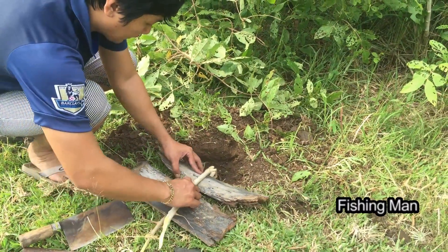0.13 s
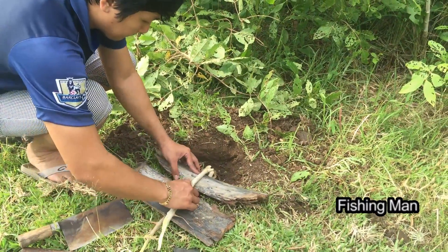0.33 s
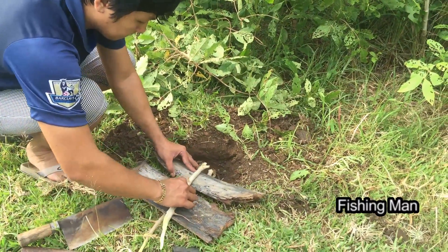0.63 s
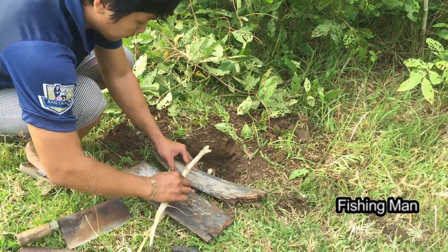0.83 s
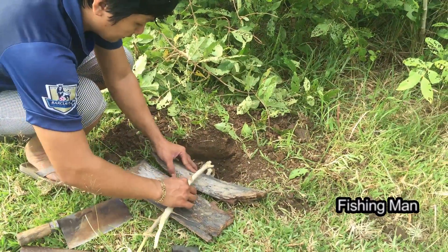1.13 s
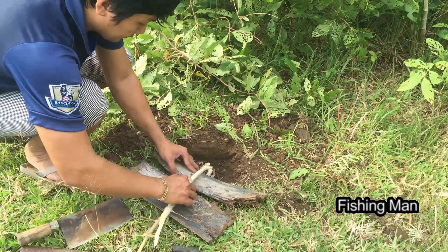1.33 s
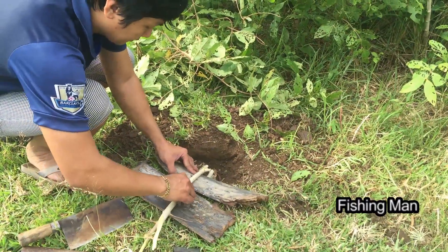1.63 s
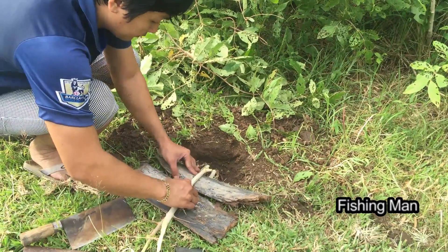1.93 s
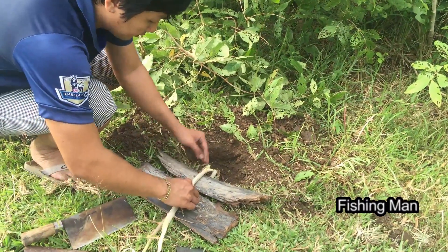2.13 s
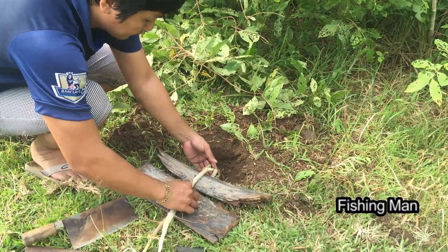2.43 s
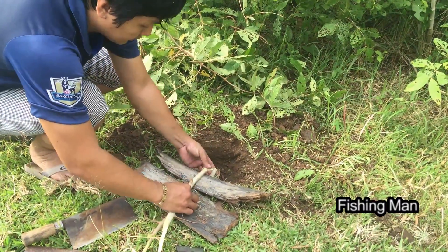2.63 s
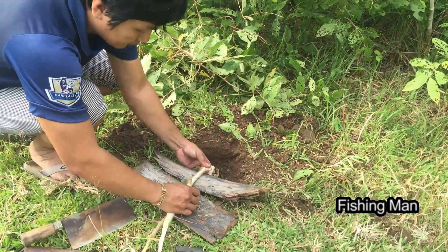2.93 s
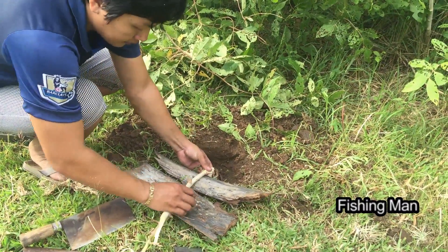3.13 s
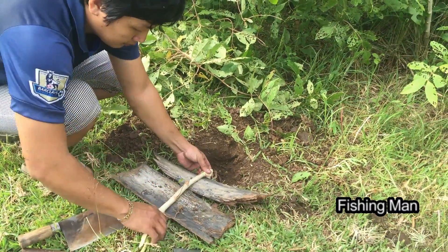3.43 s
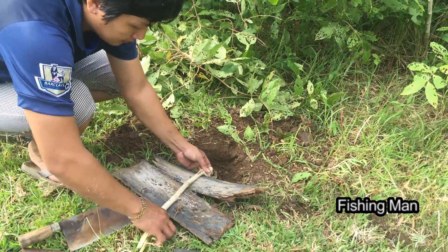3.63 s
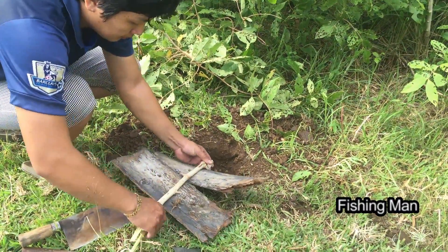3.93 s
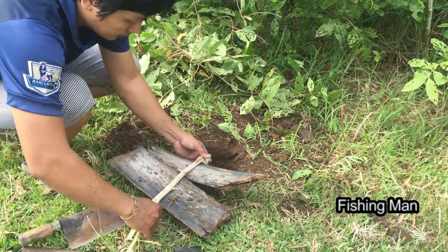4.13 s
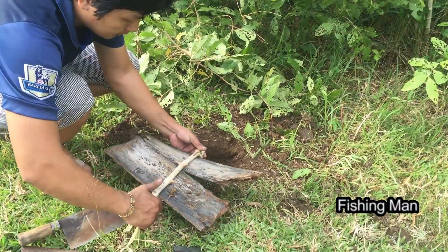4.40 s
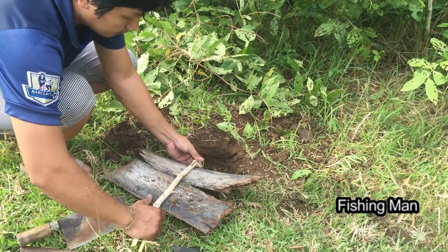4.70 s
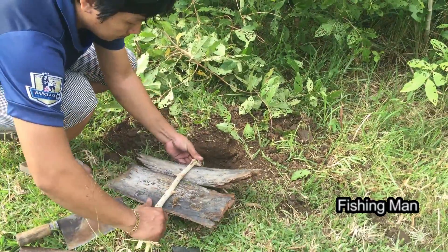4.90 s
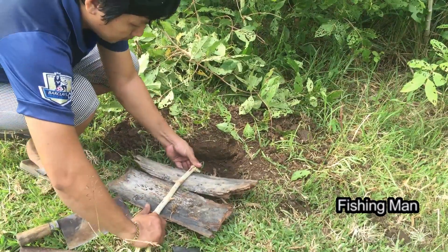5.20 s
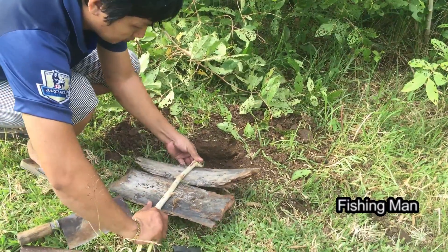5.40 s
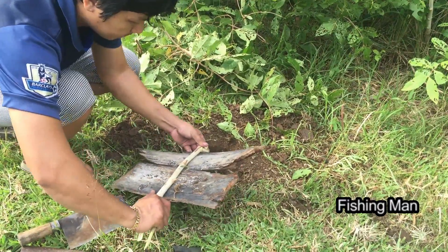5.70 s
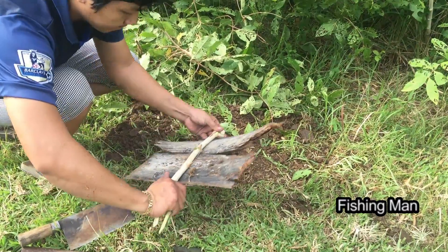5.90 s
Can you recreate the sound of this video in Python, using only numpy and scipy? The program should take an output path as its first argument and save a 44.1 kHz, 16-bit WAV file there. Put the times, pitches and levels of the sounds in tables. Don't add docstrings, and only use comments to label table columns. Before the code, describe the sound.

Outdoors, about a metre from a phone, wood clicks and bark crackles softly as grass is brushed. Faint even bird whistles repeat, then a dropped stick strikes the slab with a short dry knock, by far the loudest moment. Quick bird chips follow, with a tight burst of snapping and tapping midway. Soft late scuffs, distant thudding hammer blows and a throbbing bird churr end it, over low engine hum and breeze.

```python
import sys
import numpy as np
from scipy import signal
from scipy.fft import rfft, irfft, next_fast_len
from scipy.io import wavfile
from scipy.ndimage import uniform_filter1d

SR = 44100
rng = np.random.default_rng(int(sys.argv[2]) if len(sys.argv) > 2 else 0)


def gain_from_db(level_db):
    decades = np.asarray(level_db, float) / 20
    return 10 ** decades


def int16_out(signal):
    q = np.round(np.clip(np.atleast_2d(signal).T, -1, 1) * 32767)
    wavfile.write(sys.argv[1], SR, q.astype(np.int16))


N = 266937
T = np.arange(N) / SR


def band(x, lo_hz, hi_hz, order=2):
    return signal.sosfilt(signal.butter(order, [lo_hz, min(hi_hz, .45 * SR)], "band", fs=SR, output="sos"), x)


def unit(x):
    return x / np.sqrt(np.mean(x ** 2))


def add(out, start_s, x):
    i = int(start_s * SR)
    x = x[max(-i, 0):N - i]
    out[max(i, 0):max(i, 0) + len(x)] += x


def walk(rate_hz):
    hold = int(SR / rate_hz)
    steps = np.repeat(rng.standard_normal(N // hold + 1), hold)
    return 1.331 * uniform_filter1d(uniform_filter1d(steps, hold), hold)[:N]


def ring(modes, rise_s, peak_db):
    t = T[:SR // 8]
    x = sum(gain_from_db(db - 60 * t / t60_s) * np.sin(2 * np.pi * hz * t) for hz, db, t60_s in modes)
    x = x * (1 - np.exp(-t / rise_s))
    return x * gain_from_db(peak_db) / np.abs(x).max()


def grit(size, scatter_db):
    strength = np.minimum(rng.exponential(size=size // 16 + 1), 4.5)
    strength = np.repeat(strength, 16)[:size]
    return unit(rng.standard_normal(size) * gain_from_db(scatter_db * strength))


def scatter(x, t60_s, wet_db):
    t = T[:SR // 3]
    tail = band(rng.standard_normal(len(t)), 220, 9300, order=1) * gain_from_db(-60 * t / t60_s)
    return x + gain_from_db(wet_db) * signal.fftconvolve(x, tail / np.sqrt(np.sum(tail ** 2)))[:N]


def hush():
    # frequency in Hz, level in dB per Hz.
    spectrum = [(25, -11.5), (60, 2.5), (124, -0.5), (192, -10.5), (399, -29.5), (1730, -31.5), (4990, -40),
                (15200, -46.5)]
    # time in s, gust at the phone in dB, stirring of the leaves in dB.
    moving_air = [(0, -6, 5), (.4, 1, 0.5), (.75, -2.5, 1.5), (1.05, 0.5, -2), (1.45, 3.5, -0.5),
                  (1.75, 2.5, 1), (2.3, -5, -3), (2.7, 1.5, 0), (3.3, -2, 0.5), (3.9, 2, 2.5),
                  (4.2, -0.5, -1), (4.7, 2, -0.5), (4.97, 1, -2), (5.2, 0, 1), (5.5, 2.5, 0),
                  (6.05, 1, 1.5)]
    size = next_fast_len(N)
    hz = np.fft.rfftfreq(size, 1 / SR) + 1
    knot_hz, knot_db = np.transpose(spectrum)
    air = rfft(rng.standard_normal(size)) * gain_from_db(np.interp(np.log(hz), np.log(knot_hz), knot_db))
    air = air * gain_from_db(-49.5) / np.std(irfft(air, size))
    s, *levels = np.transpose(moving_air)
    gust, stir = (np.interp(T, s, db) for db in levels)
    lifts_db = [gust, gust, 0, 0, .7 * stir, .8 * stir, .7 * stir, 1.5 * stir, .79 * stir, stir]
    out, octave = 0, np.clip(np.log2(hz / 31.25), 0, 9)
    for k, lift_db in enumerate(lifts_db):
        share = np.clip(1 - np.abs(octave - k), 0, 1)
        out = out + irfft(air * share, size)[:N] * gain_from_db(lift_db + 1.9 * walk(12))
    return out


def engine():
    # time in s, firing rate in Hz, level in dB, lope (odd orders against even) in dB.
    running = [(0, 57.1, -50.5, -24), (.5, 58, -61.5, 1.5), (1, 57.84, -56.5, 0), (1.5, 59, -61, 0.5),
               (2, 60, -54.5, -7.5), (2.5, 60.5, -51.5, -6.5), (3, 60.34, -52.5, -3.5),
               (3.3, 61.62, -58.5, 4), (3.55, 63.2, -49.5, -13), (4, 62.4, -52, -20),
               (4.4, 61.5, -63.5, -3.5), (5.5, 61.62, -56, -4), (6.05, 63.17, -59, -1)]
    # order of the firing rate, level in dB.
    orders = [(1, 1.5), (2, 2), (3, 2.5), (4, -15.5), (5, -19.5)]
    s, *columns = np.transpose(running)
    hz, level_db, lope_db = (np.interp(T, s, c) for c in columns)
    phase = 2 * np.pi * np.cumsum(hz * (1 + .01 * walk(9))) / SR
    out = np.zeros(N)
    for k, db in orders:
        order_db = db + level_db + k % 2 * lope_db + 2.2 * walk(7)
        out += gain_from_db(order_db) * np.sin(k * phase + k ** 2)
    return out


def chatter(count, db):
    out, t = np.zeros(N), T[:SR // 20] - .025
    for when, pitch, length, size in rng.random((count, 4)):
        tone = np.sin(2 * np.pi * 450 * 2 ** (4.4 * pitch) * t)
        swell = np.exp(-(t / (.00312 + .0059 * length)) ** 2)
        add(out, when * N / SR - .025, gain_from_db(db + 10 * size - 11 * pitch) * swell * tone)
    return out


def scuffs():
    # middle in s, rms level in dB, centre in Hz, length in s. Grass brushed, bark scraped, hollow
    grass = [(0.019, -70, 3000, .081), (0.233, -61.5, 2410, 0.092), (1.731, -59, 2416, 0.027),
             (2.186, -61, 5000, 0.034), (3.144, -68.5, 3940, 0.054), (3.44, -63.5, 4000, .045),
             (3.689, -72, 4960, .12), (3.745, -60, 2500, .14), (4.772, -68.5, 9000, .08),
             (5.259, -66, 10000, .092), (5.768, -68, 8000, 0.063), (5.988, -66, 6000, 0.038)]
    scraped_bark = [(.114, -61, 1920, .055), (.519, -69, 3000, 0.099), (.709, -63.5, 2500, 0.074),
                    (.852, -65, 1200, 0.13), (1.62, -62, 1900, 0.18), (1.734, -53.5, 910, 0.068),
                    (2.47, -62.5, 2100, 0.044), (3.121, -62, 1260, 0.051), (3.971, -68.5, 5960, .13),
                    (3.8, -63, 2500, .08), (3.89, -66, 4000, .05), (3.25, -67, 1500, .1),
                    (5.88, -68, 2000, .1), (4.368, -68.5, 6000, .022), (4.909, -63, 600, 0.039)]
    hollow_slab = [(.872, -61, 6500, 0.015), (.23, -61.5, 524, 0.056), (1.56, -46, 1050, .012),
                   (2.66, -62.5, 1800, .03), (1.14, -64.5, 1020, 0.11), (1.32, -65, 1110, 0.036),
                   (2.16, -58.5, 1280, 0.11), (3.371, -62, 980, 0.11), (3.419, -58.5, 440, 0.029),
                   (4.281, -58.5, 376, 0.041), (5.744, -63, 1000, 0.074), (5.948, -63, 1010, 0.064)]
    blurred_calls = [
        (.909, -64.5, 3650, .02),
        (1.32, -65, 2870, 0.13),
        (1.43, -71, 4150, 0.045),
        (3.49, -63, 3430, 0.026),
        (4.2, -65.5, 2900, 0.5),
        (4.54, -66.5, 3570, .023),
    ]
    widths_oct = (2.9, 1.1, 0.47, .14)
    out, t = np.zeros(N), T[:SR // 4] - .125
    for rows, octaves in zip((grass, scraped_bark, hollow_slab, blurred_calls), widths_oct):
        half = 2 ** (octaves / 2)
        for s, db, hz, length_s in rows:
            rub = unit(band(grit(len(t), 4.2), hz / half, hz * half, order=1))
            stroke = np.exp(-(2 * t / length_s) ** 2) * np.hanning(len(t)) ** .27
            add(out, s + t[0], gain_from_db(db) * rub * stroke)
    return out


def snaps(rows, top_db):
    out, t = np.zeros(N), T[:SR // 8]
    for s, db, hz, t60_s in rows:
        t60_s = max(t60_s, .003)
        snap = grit(len(t), 3.4)
        body = unit(band(snap, hz / 1.08, hz * 1.07, order=1)) + 1.1 * unit(band(snap, 1700, 10500, order=1))
        top = gain_from_db(top_db) * unit(band(snap, 9000, 17000))
        shape = (1 - np.exp(-(t / (.16 * t60_s)) ** 2)) * gain_from_db(-60 * t / t60_s)
        burst = (body + top) * shape
        level = np.sqrt(np.sum(shape ** 2) / np.sum(burst ** 2)) / shape.max()
        add(out, s - .1 * t60_s, gain_from_db(db - 7.5) * burst * level)
    return out


def cracks():
    # time in s, peak in dB, centre in Hz, t60 in s.
    fibres = [(.0065, -35, 4470, 0.026), (.0112, -49, 4040, .011), (.099, -48, 5800, .009),
              (.2165, -37, 4400, 0.019), (.2154, -30, 6100, .024), (.4883, -54, 6200, .018),
              (.6494, -56, 4300, .018), (.853, -50, 3120, .021), (1.5662, -32.5, 3800, 0.011),
              (2.1866, -39.5, 2885, 0.016), (2.792, -55, 4330, .018), (3.7005, -43, 3020, .018),
              (3.7225, -44, 5150, .03), (3.7245, -30, 5500, .012), (3.7263, -27, 5900, .014),
              (3.7334, -37.5, 5090, .018), (4.6708, -47, 3100, .013), (5.0654, -50.5, 3300, .011),
              (5.806, -50, 5500, 0.055), (6.0292, -49.5, 4100, 0.016)]
    return snaps(fibres, top_db=-16.5)


def strike(contacts):
    out = np.zeros(N)
    for s, db, hz, t60_s, upper_hz, upper_db in contacts:
        t60_s = max(t60_s, .003)
        modes = [(hz, 0, t60_s), (hz * .67, -15, t60_s * .8), (upper_hz, upper_db, t60_s * 1.1),
                 (upper_hz * 1.45, upper_db - 9.5, t60_s * .6), (upper_hz * 2.2, upper_db - 17, t60_s)]
        add(out, s - .0006, ring(modes, 1.6 / hz, db))
    return out


def knocks():
    # time in s, peak in dB, main mode in Hz, t60 in s, stick mode in dB.
    hits = [(.007, -44, 1740, 0.045, 4), (0.0995, -32, 1440, 0.0093, -5.5), (3.413, -41.5, 644, 0.02, -6),
            (3.632, -57, 740, 0.026, -8), (3.687, -49, 880, .03, -21), (3.7024, -31, 830, 0.007, -12),
            (1.5533, -29, 1080, .008, -12), (1.735, -47, 1050, .012, -8), (3.7012, -29, 830, .008, -10),
            (3.7062, -50, 790, .01, -10), (4.67, -54, 900, .015, -6), (3.694, -50, 950, .012, -12),
            (3.751, -40.5, 377, 0.012, -20), (4.269, -44.5, 620, 0.024, -5),
            (4.364, -47.5, 602, 0.069, 1.5), (4.622, -47.5, 417, .022, -7), (5.065, -51.5, 548, .04, -3),
            (5.074, -38, 516, 0.028, -18)]
    return strike([(s, db, hz, t60_s, 1000, stick_db) for s, db, hz, t60_s, stick_db in hits])


def splinters():
    # time in s, peak in dB, centre in Hz, t60 in s.
    slivers = [
        (0.025, -50, 4420, 0.029),
        (.5891, -45, 3100, 0.0095),
        (1.5478, -39, 8800, .008),
        (1.551, -29, 7950, 0.0062),
        (1.5527, -28, 6800, 0.012),
        (2.1235, -41.5, 11800, 0.015),
        (4.0594, -53, 13000, .017),
        (4.297, -46, 3590, 0.011),
        (4.622, -47.5, 5250, 0.0081),
    ]
    return snaps(slivers, top_db=-5.5)


def taps():
    # time in s, peak in dB, main mode in Hz, upper mode in Hz, upper mode in dB.
    touches = [(.09, -50, 1100, 1600, -2), (.108, -49, 1100, 1700, 0), (.116, -44, 1000, 1610, 1),
               (.133, -47, 1250, 1600, -4), (.214, -37.5, 1020, 1900, 3), (.276, -49, 960, 1580, 5),
               (.336, -52, 1010, 1470, -12), (.589, -46.5, 850, 1590, 10), (.854, -52, 1080, 1410, 0),
               (1.548, -37, 1150, 1900, -4), (1.556, -42, 1080, 1880, -9), (1.969, -54, 1106, 1830, 2),
               (2.126, -50, 1070, 1460, -10), (2.157, -48, 1110, 1420, -2), (2.134, -50, 1000, 1550, 0),
               (2.151, -52, 1150, 1600, -3), (2.166, -50, 1100, 1400, -3), (2.178, -39.5, 1170, 1490, 6),
               (2.1785, -39.5, 2950, 2400, -8), (2.188, -49, 1150, 3220, -2), (3.314, -49, 970, 1540, -15),
               (3.357, -48, 1030, 1540, -7), (3.434, -46.5, 1150, 2050, -2),
               (3.661, -47.5, 1080, 1420, -21), (3.7195, -45, 1500, 2000, -6),
               (3.7225, -41, 1700, 2200, -8), (3.7253, -27.5, 1080, 1606, -1),
               (3.727, -22, 1016, 1580, -11.5), (3.7485, -47, 1500, 2000, -9), (3.869, -47, 1050, 1390, -1),
               (4.296, -48, 1165, 1435, 0)]
    return strike([(s, db, hz, .015, *upper) for s, db, hz, *upper in touches])


def ticks(count, db):
    # time in s, peak in dB, centre in Hz, t60 in s.
    small = [(.0985, -50, 6000, .012), (.2165, -40, 8700, .015), (.316, -60, 3800, .04),
             (.7213, -58, 6000, .015), (1.56, -50, 7500, .03), (1.572, -44, 3400, .04),
             (1.578, -47, 4800, .04), (1.727, -53, 4590, .02), (3.42, -53, 400, .04),
             (3.606, -58, 2950, .02), (3.699, -42, 8140, .015), (3.7255, -31, 8700, .015),
             (3.7212, -41, 5200, .03), (3.7262, -29, 5900, .022), (4.538, -60, 2000, .09),
             (2.858, -59, 4000, .012), (3.98, -60, 2990, .07), (3.734, -48, 9400, .03),
             (3.736, -47, 5700, .05), (4.372, -62, 5000, .05), (4.415, -65, 1800, .12),
             (4.528, -62, 3650, .04), (4.7225, -52, 3680, .04), (5.065, -56, 1800, .02),
             (5.077, -48, 1180, .025), (5.105, -55, 490, .05), (5.7324, -53, 9610, .012),
             (5.764, -58, 7000, .03), (5.925, -58, 9200, .03), (5.956, -60, 7000, .012),
             (5.979, -57, 7000, .03), (5.99, -60, 4500, .05), (6.003, -56, 6500, .015)]
    width = 1.12
    out, t = np.zeros(N), T[:SR // 10]
    grass = [(a * N / SR, db + 9 * b, 3500 * 2 ** (1.9 * c), .012) for a, b, c in rng.random((count, 3))]
    for s, peak_db, hz, t60_s in list(small) + grass:
        t60_s = max(t60_s, .004)
        shape = (1 - np.exp(-t / (.06 * t60_s))) * gain_from_db(-60 * t / t60_s)
        burst = band(rng.standard_normal(len(t)), hz / width, hz * width, order=1) * shape
        add(out, s - .0005, gain_from_db(peak_db) * burst / np.abs(burst).max())
    return out


def hammer():
    # time in s, thud peak in dB, thud in Hz, clang level in dB, clang centre in Hz.
    blows = [(0.122, -42.5, 255, -60, 3660), (1.102, -53.5, 273, -63.5, 2670),
             (1.63, -50.5, 252, -62, 2790), (1.735, -45.5, 222, -66, 1200), (1.851, -43.5, 256, -63.5, 980),
             (2.055, -48, 266, -65, 2420), (2.446, -52, 266, -56.5, 3670), (2.64, -53, 300, -64.5, 1790),
             (2.983, -40, 238, -63, 3060), (3.198, -46, 239, -70, 1070), (4.529, -57, 287, -60, 2090),
             (4.724, -56, 311, -55.5, 3647), (4.888, -48.5, 202, -67, 1510), (5.392, -55, 204, -82, 1830),
             (5.517, -41, 197, -63, 1075), (5.722, -45, 202, -75, 1110), (5.923, -41.5, 198, -71, 1023)]
    # Hz, level in dB, swell in s, t60 in s.
    metal = [(1060, -0.5, .02, 0.28), (1670, 1, 0.015, 0.24), (1890, -2, 0.014, .2),
             (2228, -1.5, 0.012, 0.37), (2690, -2, .008, 0.27), (2950, -0.5, .005, .2),
             (3660, 2.5, 0.00092, 0.18)]
    out, t = np.zeros(N), T[:SR // 6]

    def swell(rise_s, t60_s):
        return (1 - np.exp(-(t / rise_s) ** 2)) * gain_from_db(-60 * t / t60_s)

    for s, db, hz, clang_db, clang_hz in blows:
        add(out, s - .004, ring([(hz, 0, .09), (hz * 1.243, -8, .07)], .0078, db))
        air = rng.standard_normal(len(t))
        modes = sum(gain_from_db(g) * swell(rise_s, t60_s) * unit(band(air, f * .992, f * 1.008, order=1))
                    for f, g, rise_s, t60_s in metal)
        lead = unit(band(air, clang_hz * .99, clang_hz * 1.01)) + np.sin(2 * np.pi * clang_hz * t)
        smear = swell(.01, .35) * unit(band(air, 1180, 2700))
        clang = smear + .83 * modes + .72 * lead * swell(10 / clang_hz, .21)
        add(out, s - .002, gain_from_db(clang_db - 5) * clang)
    return out


def blurred_notes(rows):
    out, t = np.zeros(N), T[:SR // 10] - .05
    for s, length_s, hz, db in rows:
        air = rng.standard_normal(len(t))
        note = np.sin(2 * np.pi * hz * t) + .39 * unit(band(air, hz * .97, hz * 1.03))
        add(out, s - .05, gain_from_db(db) * np.exp(-(1.8 * t / length_s) ** 2) * note)
    return out * gain_from_db(1.7 * walk(120))


def pips():
    # middle in s, length in s, pitch in Hz, peak in dB.
    strays = [(.155, .03, 2710, -58.5), (.67, .025, 2790, -68), (.995, .015, 3500, -70),
              (1.24, .02, 3350, -68), (1.245, .025, 2830, -65), (1.248, .012, 3980, -69),
              (1.268, .008, 3350, -65), (1.395, 0.054, 2750, -71), (1.405, .02, 3400, -72),
              (1.428, .025, 4250, -71), (2.06, .018, 2410, -62), (2.078, .012, 1950, -67),
              (2.135, .012, 3160, -60), (3.012, .016, 3050, -64), (3.032, .01, 2980, -69),
              (2.922, 0.012, 2976, -65), (3.36, 0.018, 2810, -65), (3.4, .025, 2900, -67),
              (3.496, .012, 2950, -60), (3.528, 0.014, 2800, -59), (3.486, .015, 3770, -64),
              (4.345, .03, 3050, -72), (4.083, .015, 2830, -69), (4.115, .04, 3300, -69),
              (4.2, .035, 3310, -68), (4.225, .035, 2480, -68), (4.195, .025, 2150, -72),
              (4.28, .04, 3350, -69), (4.31, .02, 2940, -69), (4.44, 0.04, 2280, -72)]
    return blurred_notes(strays)


def sing(curves, rough_db, wobble):
    out, waver, drift = np.zeros(N), gain_from_db(rough_db * walk(90)), 1 + wobble * walk(150)
    for s, hz, db in map(np.transpose, curves):
        t = np.arange(s[0], s[-1], 1 / SR)
        tone = np.sin(2 * np.pi * np.cumsum(np.interp(t, s, hz) * np.interp(t, T, drift)) / SR)
        level = np.sqrt(2) * gain_from_db(np.interp(t, s, db))
        add(out, s[0], level * signal.windows.tukey(len(t), .08) * tone)
    return out * waver


def whistles():
    # start in s, pitch in Hz, start, held and end levels in dB.
    notes_sung = [
        (.347, 2712, -61.5, -67, -80),
        (.567, 2750, -52, -60, -66),
        (.784, 2693, -62.5, -54, -55),
        (1.025, 2715, -55, -51, -51),
        (1.265, 2705, -50, -52, -53),
    ]
    length_s, catch_s, edge_s, sag_hz_per_s = .0917, .027, .0083, 600
    curves = []
    for s, hz, start_db, held_db, end_db in notes_sung:
        bend = .75 + .05 * (start_db - held_db)
        end_hz = hz - bend * sag_hz_per_s * length_s / 2
        curves.append([(s, hz * 1.07, start_db - 3),
                       (s + edge_s, hz * 1.028, start_db),
                       (s + catch_s, hz * 1.017 ** bend, (start_db + held_db) / 2 - 6.5),
                       (s + catch_s + edge_s, hz * 1.01 ** bend, held_db),
                       (s + length_s - edge_s, end_hz, end_db),
                       (s + length_s, end_hz * .985, end_db - 22)])
    return sing(curves, 1, .003)


def chips():
    # time in s, peak in dB, pitch in Hz, breathy note in dB, glide in Hz per s.
    calls = [(1.4694, -65, 2720, -74, 0), (1.8487, -62.5, 2900, -79, -2000), (2.2, -60.5, 2850, -85, 0),
             (2.898, -51, 2944, -73, 1499), (2.988, -44.5, 2980, -66.5, 3000),
             (3.073, -54.5, 3100, -62, 8001), (3.158, -58, 3000, -63, 2500), (3.252, -52, 3010, -63, 3002),
             (3.328, -46.5, 2930, -61.5, -5000), (3.416, -54, 2950, -59, 2500),
             (3.508, -55, 2800, -68, 3000), (3.601, -52, 2940, -69.5, -3000),
             (3.8767, -51, 2950, -74, 1000), (3.9624, -50.5, 2980, -70, 1000),
             (4.13, -58, 2954, -83, -3000), (4.197, -55, 2910, -80, -2000), (4.23, -63, 2900, -79, -2000),
             (4.262, -64, 2880, -80, -1000)]
    out, t = np.zeros(N), T[:SR // 10] - .05
    for s, db, hz, upper_db, glide in calls:
        length_s = .023 - .001 * max(db + 52.5, -12)
        air = rng.standard_normal(len(t))
        note = np.sin(2 * np.pi * t * (hz + glide * t / 2)) + .19 * unit(band(air, hz * .96, hz * 1.04))
        add(out, s - .043, gain_from_db(db - 1.5) * np.exp(-(2 * t / length_s) ** 2) * note)
        add(out, s - .06, gain_from_db(upper_db) * np.exp(-(t / .011) ** 2) * unit(band(air, 3800, 4200)))
        lower_breath = unit(band(air[::-1], 3300, 3650))
        add(out, s - .054, gain_from_db(upper_db - 6.5) * np.exp(-(t / .009) ** 2) * lower_breath)
    return out * gain_from_db(1.7 * walk(120))


def drop():
    # time in s, peak in dB, pitch factor, tilt in dB per octave.
    bounces = [
        (1.5665, -7, 1.3, 0),
        (1.5674, -1.2, .86, 0),
        (1.5709, -21, .8, -7),
        (1.5737, -18, .92, -11),
        (1.5772, -32, .98, -5),
    ]
    # slab mode in Hz, level in dB, t60 in s.
    slab = [(437, -20, .018), (691, -10.5, .0176), (865, -.5, .0057), (1162, -4, .0078), (1856, -.5, .0062),
            (2628, -8, .0075), (4860, -24, .0034)]
    out = np.zeros(N)
    for s, db, pitch, tilt_db in bounces:
        modes = [(hz * pitch, g + tilt_db * np.log2(hz / 700), t60_s) for hz, g, t60_s in slab]
        add(out, s, ring(modes, .00015, db))
    return out


def slides():
    # start in s, length in s, first and last pitch in Hz, peak in dB.
    falls = [
        (1.815, .035, 2780, 1720, -67),
        (2.032, .02, 3200, 2670, -59),
        (4.375, .09, 2750, 2450, -73.5),
        (5.079, 0.2, 2520, 1530, -68),
    ]
    peak_at = .2
    curves = [[(s, from_hz, db - 5),
               (s + peak_at * length_s, from_hz + peak_at * (to_hz - from_hz), db),
               (s + length_s, to_hz, db - 9)] for s, length_s, from_hz, to_hz, db in falls]
    return sing(curves, 3, .018)


def churr():
    # middle in s, length in s, pitch in Hz, peak in dB.
    beads = [(5.517, 0.029, 4260, -62), (5.557, 0.021, 4280, -65), (5.6, .015, 4170, -69),
             (5.638, .025, 4250, -68), (5.685, .02, 4210, -68), (5.708, .01, 4180, -72),
             (5.515, .05, 3300, -70), (5.535, .015, 3070, -70), (5.57, 0.021, 3290, -58),
             (5.606, .012, 3330, -60), (5.622, .015, 3280, -68), (5.654, .012, 3350, -63),
             (5.668, .01, 3190, -64), (5.705, .03, 3310, -66), (5.51, .022, 2150, -67),
             (5.57, .05, 2130, -74), (5.638, 0.022, 2140, -66), (5.685, .025, 2154, -68),
             (5.725, .015, 2150, -71), (5.522, .022, 1060, -60), (5.553, 0.033, 1060, -64),
             (5.59, .025, 1110, -70), (5.725, .025, 1060, -62)]
    return blurred_notes(beads)


def birds():
    return scatter(pips() + whistles() + chips() + slides() + churr(), .2, -15)


def scene():
    wood = band(knocks() + taps() + drop(), 320, 16000)
    near = scatter(wood + scuffs() + cracks() + splinters(), .3, -30.5)
    far = hush() + engine() + chatter(count=700, db=-73.5) + hammer() + birds()
    return (near + far + ticks(count=160, db=-70))[None]


def band_limit(x):
    return signal.sosfilt(signal.butter(12, 16670, fs=SR, output="sos"), x)


def record(dry):
    port_hz = 10440
    notch = .34 * band(dry, port_hz * .95, port_hz * 1.05, order=1)
    peak = .25 * band(dry, port_hz * 1.07, port_hz * 1.17, order=1)
    mic = signal.sosfilt(signal.butter(4, 42, "high", fs=SR, output="sos"), dry - notch + peak)
    mic = signal.sosfilt(signal.ellip(8, .3, 45, 15900, fs=SR, output="sos"), mic)
    return band_limit(mic)


dry = scene()
out = record(dry)
int16_out(out)
```